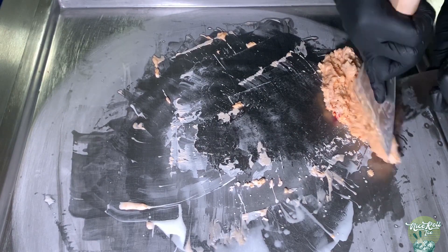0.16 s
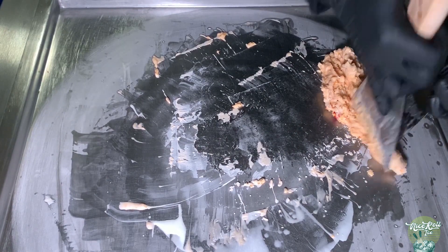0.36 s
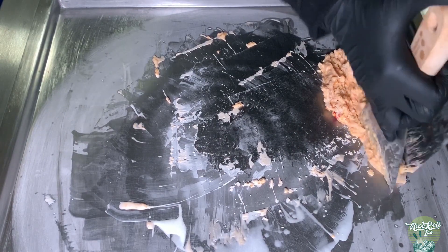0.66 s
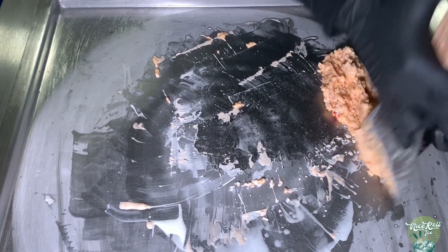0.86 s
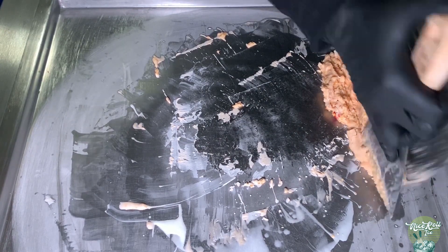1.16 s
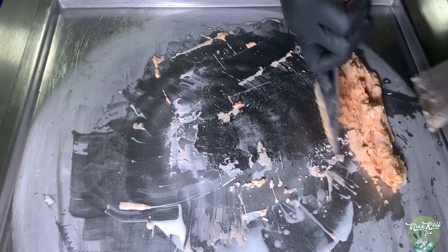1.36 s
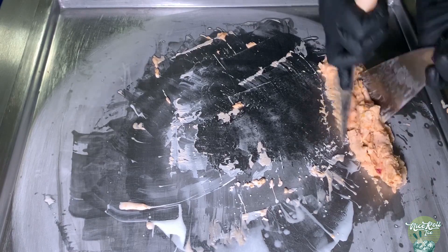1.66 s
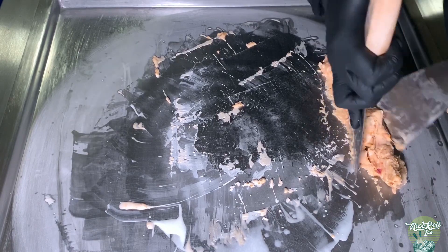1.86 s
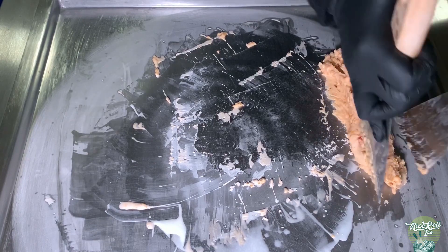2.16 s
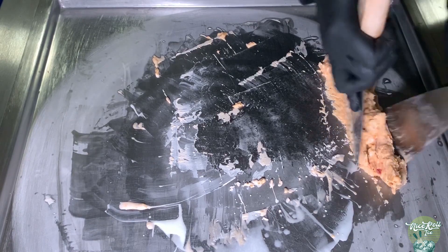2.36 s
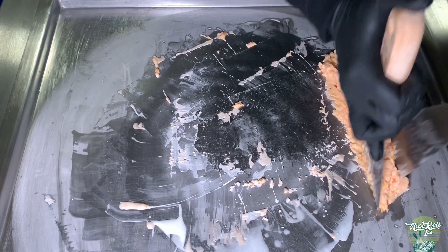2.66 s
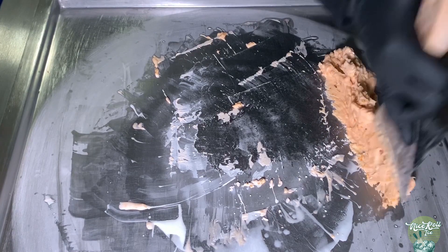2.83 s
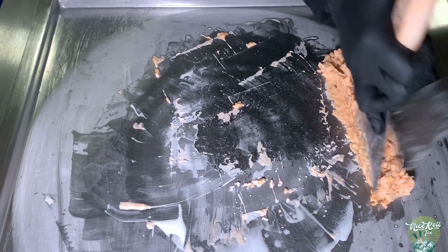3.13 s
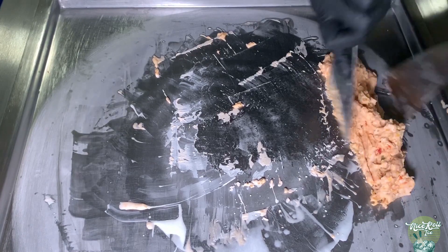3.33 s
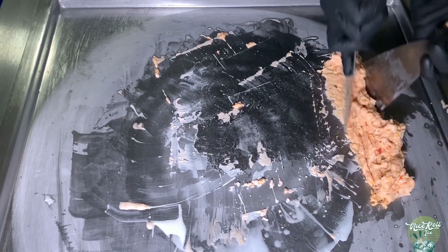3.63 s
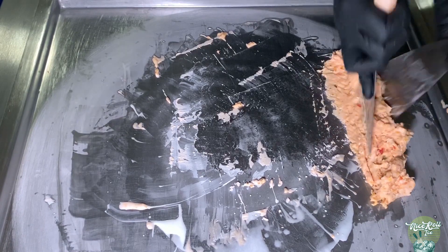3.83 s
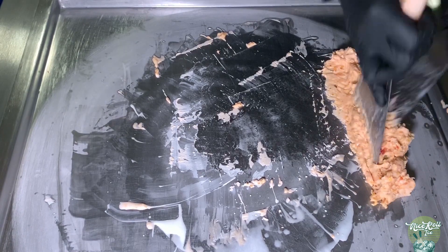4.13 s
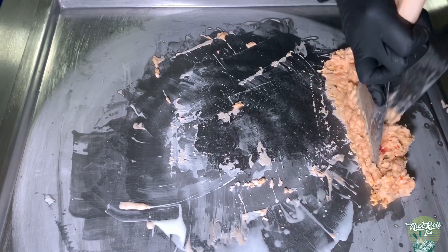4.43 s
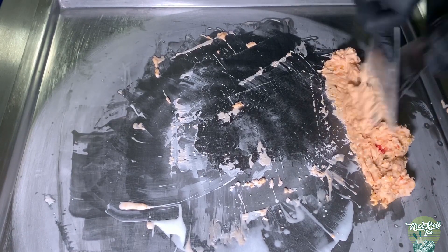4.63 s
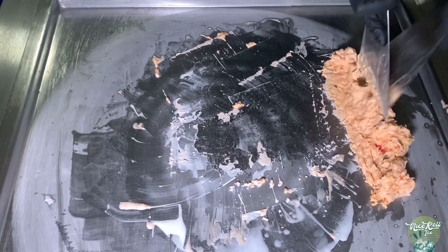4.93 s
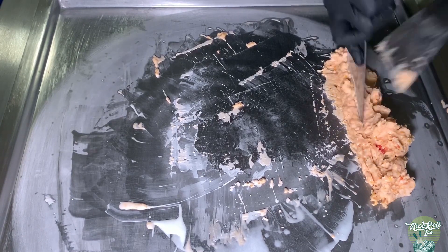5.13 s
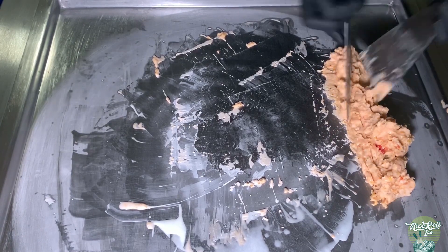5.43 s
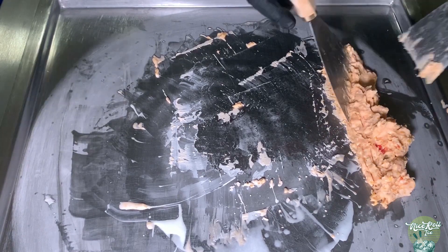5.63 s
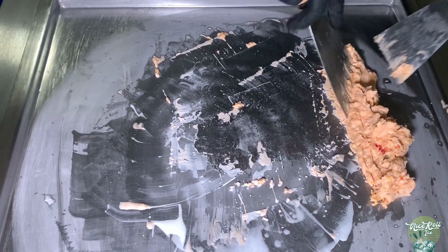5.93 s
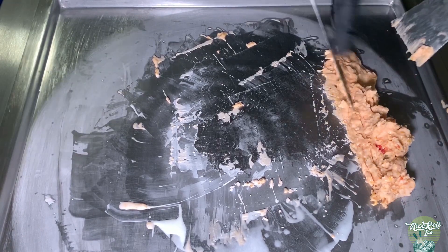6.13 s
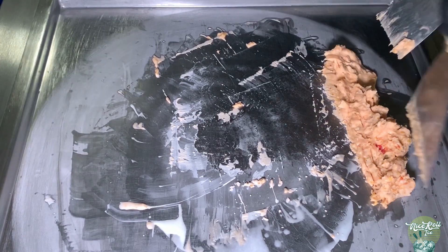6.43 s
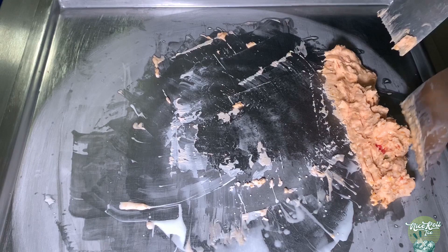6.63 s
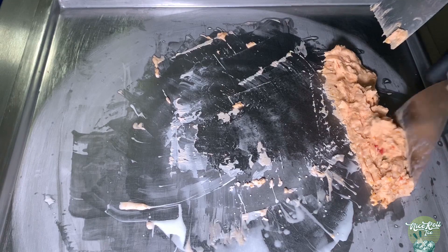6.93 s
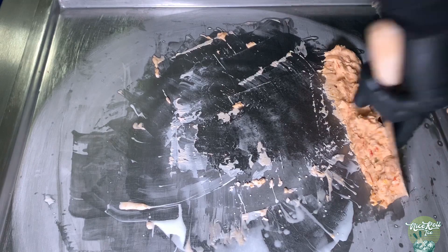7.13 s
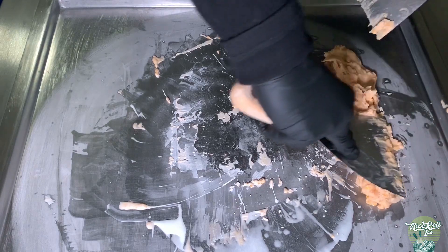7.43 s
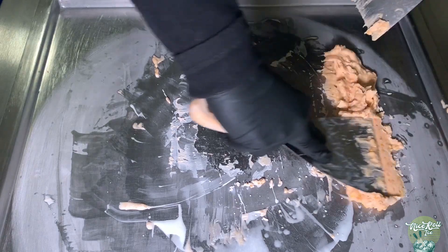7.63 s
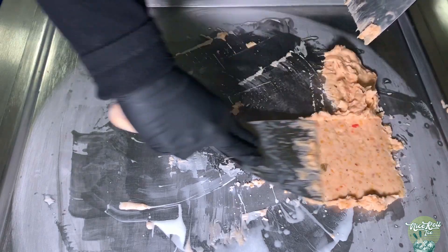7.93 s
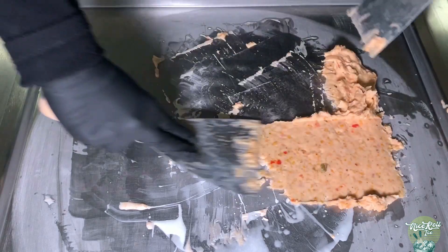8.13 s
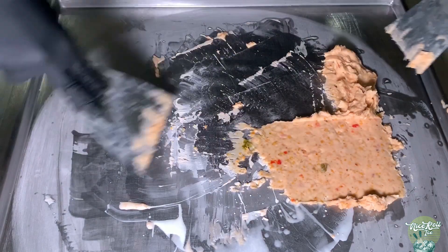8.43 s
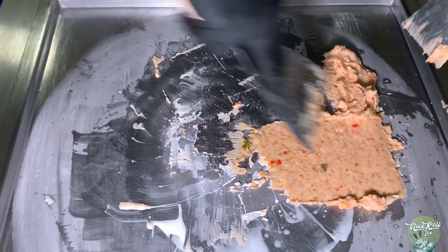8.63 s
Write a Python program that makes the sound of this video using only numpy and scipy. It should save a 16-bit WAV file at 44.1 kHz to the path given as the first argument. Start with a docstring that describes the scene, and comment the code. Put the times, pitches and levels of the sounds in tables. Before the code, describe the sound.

Two metal spatulas chop and clack quickly on a cold steel plate, with short squeaky scrapes, over a steady low compressor hum and fan rush.

```python
"""A compressor hums and its fan rushes; then two steel spatulas chop half-frozen cream on a cold plate.
Hum is a sum of wavering sines and the fan is coloured noise; each blow is a burst of bending waves that
excites the resonances of plate and blade. Dragged edges judder in stick and slip or squeal, cream
crunches as random breaking grains, and one long stroke rasps. A small hard room answers the spatulas."""
import sys
import numpy as np
from scipy import signal
from scipy.fft import rfft, irfft, next_fast_len
from scipy.io import wavfile
from scipy.ndimage import uniform_filter1d

SR = 44100
rng = np.random.default_rng(int(sys.argv[2]) if len(sys.argv) > 2 else 0)


def generate_wav(sig):
    """Save sig (samples, or channels by samples) to the path in sys.argv[1] as 16-bit PCM at SR."""
    pcm = np.round(np.clip(np.atleast_2d(sig).T, -1, 1) * 32767).astype(np.int16)
    wavfile.write(sys.argv[1], SR, pcm)


N = 387198
TIME = np.arange(N) / SR

# blade dragged in stick and slip: (t/s, length/s, relative level/dB, first slip rate f/Hz,
# last slip rate f/Hz, roughness 0-1)
DRAG_STROKES = [(1.511, 0.122, -26.5, 688, 669, 0.17), (1.623, 0.086, -29.5, 845, 930, .17),
                (1.724, 0.065, -43, 897, 819, 0.12), (2.438, 0.044, -28.5, 754, 696, 0.18),
                (2.491, 0.043, -27, 725, 788, .14), (3.544, 0.056, -38, 906, 865, 0.22),
                (3.628, 0.0584, -27.5, 830, 901, 0.29)]
# resonances of plate and blade in contact: (f/Hz, width/Hz, lift/dB)
CONTACT_MODES = [(620, 45, 9), (673, 64, 5.5), (754, 45, 5.5), (910, 38, 5.5), (1033, 106, 5.5),
                 (1556, 140, 3.5), (1790, 43, 2), (1890, 60, 7), (2580, 270, 3.5), (2820, 120, 3),
                 (3780, 330, 1.5), (6270, 680, 4), (8100, 49, 8.5), (8770, 140, 8.5)]
# spectrum of the sounding blade: (f/Hz, relative level/dB)
BLADE_SPECTRUM = [(500, -0.5), (2000, -3.5), (3500, -1.5), (5500, -3), (8500, 2.5), (12000, 0.5),
                  (16000, -4.5)]

# strokes: attack and release times, and rates of easing off (a negative rate swells)
DRAG_ATTACK_S, PUSH_ATTACK_S, RELEASE_S = 0.018, 0.011, 0.021
DRAG_EASE_DB_PER_S, CRUNCH_EASE_DB_PER_S, RASP_EASE_DB_PER_S = 38, -1, 15
# start and length of the long spreading stroke, which both rasps and crunches
SPREAD_S, SPREAD_LENGTH_S = 8.171, 0.26


def from_db(db):
    """Level to amplitude: 20 dB is a factor of ten."""
    return 10 ** (np.asarray(db) / 20)


def rms_one(x):
    """Normalisation to unit mean power."""
    return x / np.sqrt(np.mean(x ** 2) + 1e-20)


def at_hz(points, hz):
    """Interpolation of a spectrum on a logarithmic frequency axis."""
    points = np.array(points)
    return np.interp(np.log(np.maximum(hz, 1)), np.log(points[:, 0]), points[:, 1])


def add(track, s, sound):
    """Superposition: a sound is summed into a track from time s."""
    at = round(s * SR)
    track[..., at:at + sound.shape[-1]] += sound[..., :N - at]


def band(x, low_hz, high_hz):
    """Band-pass filtering with a maximally flat response."""
    edges = [low_hz, min(high_hz, .45 * SR)]
    return signal.sosfilt(signal.butter(2, edges, "band", fs=SR, output="sos"), x)


def drift(rate):
    """Random modulation of unit spread, interpolated between `rate` knots per second."""
    knots = rms_one(rng.standard_normal(int(rate * N / SR) + 2))
    return np.interp(TIME * rate, np.arange(len(knots)), knots)


def pair(x, likeness):
    """Interchannel correlation: sum and difference of two unrelated signals become left and right."""
    c = np.clip(likeness, -1, 1)
    common = np.sqrt(1 + c) * x[0]
    opposed = np.sqrt(1 - c) * x[1] * np.array([[1], [-1]])
    return (common + opposed) / np.sqrt(2)


def causal(x, db):
    """Minimum-phase filtering: the folded cepstrum of a gain curve (even grid) gives its causal response."""
    cepstrum = irfft(np.log(from_db(db)))
    half = cepstrum.shape[-1] // 2
    cepstrum[..., 1:half] *= 2
    cepstrum[..., half + 1:] = 0
    response = np.atleast_2d(irfft(np.exp(rfft(cepstrum))))
    return signal.fftconvolve(x, response, axes=-1)[:, :x.shape[-1]]


def colour(x, spectrum, modes=(), size=8192):
    """Source-filter colouring: a broad spectrum with resonance peaks on top."""
    hz = np.arange(size // 2 + 1) * SR / size
    peaks = sum(lift / (1 + (2 * (hz - f) / width) ** 2) for f, width, lift in modes)
    return causal(x, at_hz(spectrum, hz) + peaks)


def evened(x, size=9):
    """Spectral whitening: chance peaks are evened out, so that a burst has no pitch of its own."""
    power = uniform_filter1d(np.abs(rfft(x)) ** 2, size)
    return causal(x, -10 * np.log10(power + 1e-12))


def dense_noise(n, size=1024, count=4):
    """Diffuse noise pair: repeated flattening of the short-time spectrum evens energy over time and pitch."""
    x = rng.standard_normal((2, n))
    for _ in range(count):
        cells = signal.stft(x, nperseg=size)[2]
        x = signal.istft(cells / (np.abs(cells) + 1e-12), nperseg=size)[1][:, :n]
    return rms_one(x)


def stroke(start, length, attack_s, ease_db_per_s):
    """Contact pressure of one stroke over the whole scene: attack, exponential easing, release."""
    t = TIME - start
    attack = np.clip(t / attack_s, 0, 1)
    release = np.clip((length - t) / RELEASE_S, 0, 1)
    return attack * release * from_db(-ease_db_per_s * np.clip(t, 0, length))


def grains(per_s, spread_db, likeness):
    """Random fracture: ice crystals break as sparse impulses, a few of them loudly."""
    sizes = from_db(spread_db * np.minimum(rng.exponential(1, (2, N)), 4))
    signed = sizes * rng.choice([-1, 1], (2, N))
    return pair(signed * (rng.random((2, N)) < per_s / SR), likeness)


def gripped(share, damping, spot_db=3.0, grip=0.033):
    """Contact damping: the edge's grip scales width and lift; spot and grip favour and shift each mode."""
    chance = rng.uniform(-0.99, 1, (len(CONTACT_MODES), 2))
    return [(hz * (1 + grip * shift), width * damping, share * lift + spot_db * favour)
            for (hz, width, lift), (shift, favour) in zip(CONTACT_MODES, chance)]


def contact(t60, snap, likeness, rise_s=.0001, hold=1.27, size=3072):
    """Impact: a snap, then bending waves build up, hold, and scatter differently to the two sides."""
    t = np.arange(size) / SR
    envelope = from_db(-60 * (t / t60) ** hold) * (1 - np.exp(-t / rise_s))
    waves = pair(rng.standard_normal((2, size)), likeness) * envelope
    waves[:, 0] += snap
    return evened(waves)


def unit_blow(x):
    """Short-time normalisation: the loudest five milliseconds get an rms of 1."""
    power = uniform_filter1d(np.mean(x ** 2, axis=0), SR // 200, mode="constant")
    return x / np.sqrt(power.max())


def struck(force, spectrum, rings, free_share=0.61, damping=1.23):
    """Forced resonance: one blow rings out briefly and reaches the right side first."""
    left_lag_s = .00005
    padded = np.pad(force, ((0, 0), (0, SR // 10)))   # time to ring out
    left, right = colour(padded, spectrum, gripped(free_share, damping) + rings)
    return np.array([np.roll(left, round(left_lag_s * SR)), right])


def compressor(waver_db=1.5, rattle_db=3.5, pan_db=-0.9):
    """Line spectrum: shaft and mains lines stand firm; the higher panel tones waver more."""
    # hum lines: (f/Hz, level/dB rms before waver and pan, phase of left against right/rad)
    lines = [(49.4, -36.5, .05), (100, -29.5, 0.34), (109.6, -45.5, 0.17), (148.4, -44.5, 0.16),
             (222.1, -47.5, 0.41), (247.7, -45, .1), (296.2, -49, .2), (392.4, -53.5, .2),
             (433, -53.5, 1.73)]
    out = 0
    for k, (hz, db, lead) in enumerate(lines):
        loose = waver_db if k < 2 else rattle_db
        phase = 2 * np.pi * hz * TIME + 0.05 * loose * drift(5) + rng.uniform(0, 2 * np.pi)
        tone = np.sqrt(2) * np.sin(phase + lead * np.array([[.5], [-.5]]))
        out = out + from_db(db + loose * drift(7)) * tone
    return out * from_db([[pan_db], [-pan_db]])


def fan(rush_db=-34 - 1, rumble_db=-37):
    """Broadband flow noise through cabinet and pipe resonances, with a lumpy narrow-band cabinet rumble."""
    # spectrum of the rush: (f/Hz, relative level/dB)
    rush_spectrum = [(130, -7), (165, -1), (195, -10), (270, -13.5), (340, -17), (420, -18), (490, -24.5),
                     (650, -22), (1000, -22), (2000, -29), (4000, -39), (7000, -44.5), (12000, -47.5),
                     (16000, -57.5)]
    # cabinet and pipe resonances in the rush: (f/Hz, width/Hz, lift/dB)
    cabinet_modes = [(579, 113, 8), (904, 18, 9), (2440, 9.9, 10.5), (2694, 15, 11), (4750, 17, 13),
                     (5070, 44, 8), (8230, 180, 9.5)]
    # correlation of left and right: (f/Hz, likeness)
    side_likeness = [(50, .98), (150, 0.96), (300, 1), (500, 0.15), (1000, 0.2), (3000, 0.06), (9000, 0.05)]
    right_lag_s = .00032   # the fan stands to the left
    hz = np.arange(N // 2 + 1) * SR / N
    arrival = np.exp(-2j * np.pi * hz * right_lag_s * np.array([[0], [1]]))
    noise = rfft(rng.standard_normal((2, N)))
    air = irfft(arrival * pair(noise, at_hz(side_likeness, hz)), N)
    high_pass = signal.butter(2, 125, "high", fs=SR, output="sos")
    rush = signal.sosfilt(high_pass, colour(air, rush_spectrum, cabinet_modes))
    rumble = band(band(air, 117.0, 176.4), 117.0, 176.4)
    return from_db(rush_db) * rms_one(rush) + from_db(rumble_db) * rms_one(rumble)


def knocks(knock_db=-18.0, clang_db=-18.0, sizzle_db=-28,
           plate_width_hz=220, plate_lift_db=4.5, blade_width_hz=280, blade_lift_db=6):
    """Dispersion of bending waves: high ones arrive first and die first, and grow with the bite."""
    # edge strikes plate: (t/s, relative level/dB, thud level/dB, bite offset/dB, sizzle offset/dB,
    # plate ring f/Hz, blade ring f/Hz); bite and sizzle are low where cream cushions the blow
    # and high where the edge meets bare steel
    plate_blows = [(0.342, -8, -23.5, -10.5, -3.5, 660, 2640), (0.439, -12, -24, 2.5, 5, 760, 2200),
                   (0.527, -3.5, -28, -3.5, -3.5, 650, 2700), (0.573, -2, -21, 1.5, 4, 640, 2200),
                   (0.711, -3, -22, 1.5, 1, 760, 2500), (0.876, -3.5, -30, -7, -6, 740, 2300),
                   (0.944, -2.5, -21.5, 4, 3, 750, 2670), (1.041, -0.5, -25, -0.5, 1.5, 655, 2420),
                   (1.16, -16.5, -17, 1, -1, 740, 2400), (1.494, -9, -26, 4, -1, 700, 2680),
                   (1.503, -4.5, -16.5, 7, 1, 700, 2660), (1.584, -13, -18.5, -0.5, 0, 680, 2300),
                   (1.638, -15, -18, -9, -1, 850, 1750), (2.412, -1.5, -23, -4.5, -4, 645, 2630),
                   (2.498, -15, -33, 1.5, -1, 750, 2160), (2.73, -12, -25, 0, 1, 680, 2650),
                   (3.415, -7.5, -20.5, 0.5, 2, 855, 2600), (3.44, -11.5, -14.5, 13.5, 8, 730, 2880),
                   (3.452, -17.5, -13, 4, 7, 730, 2500), (4.069, -3.5, -29, -3, -3, 660, 2370),
                   (4.603, -21.5, -25, -9, -1, 930, 2000), (4.769, -2, -13, 2, -3, 785, 2850),
                   (5.023, -1.5, -21, -1, -2, 720, 2520), (5.385, -5, -19.5, -1, -0.5, 720, 2480),
                   (8.257, -25, -30, 15.5, 22, 920, 2330), (8.281, -25, -20, 9.5, 25, 900, 3300)]
    # spectrum of the struck plate: (f/Hz, relative level/dB)
    plate_spectrum = [(100, 3.5), (270, 0), (480, -2.5), (750, 1), (1300, -3), (2200, 5.5), (3200, 0),
                      (5000, 1.5), (7400, 7.5), (10000, 3.5), (15000, 6.5)]
    # thud and broad upper ring under a pressing edge, hollows between: (f/Hz, width/Hz, lift/dB)
    pressed_modes = [(346, 120, 5), (591, 67, -3.5), (840, 55, -4), (1001, 115, 5)]
    # clang of a struck blade: (multiple of its ring frequency, share of the lift)
    partials = [(.7, 0.33), (1, 0.85), (1.22, 0.33)]
    chatter_s = 0.025   # reference for the decay of the edge's chatter; each band takes a share of it
    out = np.zeros((2, N))
    for s, db, thud, bite, sizzle, plate_hz, blade_hz in plate_blows:
        low = band(contact(0.79 * chatter_s, snap=0.61, likeness=0.98, rise_s=0.0061), 125, 437)
        mid = band(contact(0.93 * chatter_s, snap=2.1, likeness=0.59, rise_s=0.0012), 435, 1253)
        high = band(contact(0.78 * chatter_s, snap=1.93, likeness=0.42, rise_s=0.00082), 1310, 3770)
        top = band(contact(0.46 * chatter_s, snap=2.4, likeness=0.47, rise_s=0.00026), 3800, 11800)
        force = from_db(thud) * unit_blow(low) + from_db(knock_db) * unit_blow(mid)
        force += from_db(clang_db + bite) * unit_blow(high)
        force += from_db(sizzle_db + sizzle) * unit_blow(top)
        rings = [(plate_hz, plate_width_hz, plate_lift_db)]
        rings += [(blade_hz * k, blade_width_hz, share * blade_lift_db) for k, share in partials]
        add(out, s, from_db(db) * struck(force, plate_spectrum, rings + pressed_modes))
    return out


def room(x, delay_s=0.0027, build_s=0.00061, likeness=0.1):
    """Reverberation: dense reflections, different on each side, die sooner in the treble."""
    # reverberation time: (f/Hz, t60/s)
    decay_times = [(200, 0.45), (530, 0.49), (1400, 0.22), (3700, 0.17), (9700, 0.19)]
    # spectrum of the reflections: (f/Hz, relative level/dB)
    echo_spectrum = [(150, -14), (380, 7.5), (660, 1), (1900, 5), (2700, 2), (4500, 2), (9000, -6.5),
                     (15000, -4.5)]
    t = np.arange(SR // 2) / SR
    edges = np.geomspace(100, 18000, num=11)
    tail = 0
    # neighbouring bands use different noises
    noises = [pair(dense_noise(len(t)), likeness) for _ in range(2)]
    for k, (low, high) in enumerate(zip(edges, edges[1:])):
        t60 = at_hz(decay_times, np.sqrt(low * high))
        tail = tail + band(noises[k % 2], low, high) * from_db(-60 * t / t60)
    build_up = 1 - np.exp(-np.maximum(t - delay_s, 0) / build_s)
    tail = evened(tail * build_up, size=31)
    tail = colour(tail / np.sqrt(np.sum(tail ** 2) / 2), echo_spectrum)
    return signal.fftconvolve(x, tail, axes=-1)[:, :N]


def crunches(clump_db=3.5, drag_crunch_db=-12.5, spread_crunch_db=-41):
    """Granular fracture: cream crumbles along the blade under each push, drag and the spreading stroke."""
    # blade shears the frozen cream: (t/s, length/s, relative level/dB)
    pushes = [(0.793, .12, -44.5), (0.905, 0.067, -33), (1.105, 0.063, -35.5), (1.498, 0.039, -27),
              (2.489, 0.033, -30.5), (3.505, 0.05, -42.5), (5.617, 0.32, -56), (6.925, 0.05, -44)]
    pressure = sum(from_db(db) * stroke(s, length, PUSH_ATTACK_S, CRUNCH_EASE_DB_PER_S)
                   for s, length, db in pushes)
    # cream crumbles ahead of every dragged edge, at a level relative to the drag
    pressure += sum(from_db(db + drag_crunch_db) * stroke(s, length, DRAG_ATTACK_S, DRAG_EASE_DB_PER_S)
                    for s, length, db, *_ in DRAG_STROKES)
    spread = stroke(SPREAD_S, SPREAD_LENGTH_S, PUSH_ATTACK_S, CRUNCH_EASE_DB_PER_S)
    pressure += from_db(spread_crunch_db) * spread
    clumps = from_db(clump_db * drift(130))
    ice = grains(per_s=5600, spread_db=4.5, likeness=0.063)
    return pressure * clumps * rms_one(colour(ice, BLADE_SPECTRUM, CONTACT_MODES))


def ticks(level_db=-15.5, clang_db=-19, ring_width_hz=1400, ring_lift_db=8.0):
    """Impulsive excitation of a high blade resonance gives a thin, bright click."""
    # bright clicks of a blade, some on top of a plate blow: (t/s, relative level/dB, blade ring f/Hz)
    clicks = [(0.835, -24, 13000), (0.858, -16.5, 9900), (1.119, -21, 9400), (1.145, -21, 13000),
              (2.881, -13, 13700), (2.891, -7.5, 13400), (3.031, -24.5, 13000), (3.072, -26, 13000),
              (3.100, -7.5, 8150), (3.115, -11, 13500), (3.44, -5, 9100), (4.441, -30, 9000),
              (4.769, -6.5, 9100), (5.544, -16, 8950), (8.219, -12.5, 9450), (8.280, -7, 9200)]
    out = np.zeros((2, N))
    for s, db, ring_hz in clicks:
        click = unit_blow(contact(t60=0.018, snap=1.1, likeness=0.067))
        body = unit_blow(band(contact(t60=0.024, snap=1.3, likeness=0.16), 1900, 6400))
        force = from_db(db + level_db) * (click + from_db(clang_db) * body)
        add(out, s, struck(force, BLADE_SPECTRUM, [(ring_hz, ring_width_hz, ring_lift_db)]))
    return out


def squeals(waver=0.027, judder_db=3.0, overtone_db=-20):
    """Friction locking onto a blade resonance: a gliding tone swells and fades, shaken by the ice's grip."""
    # squealing edge: (t/s, length/s, level/dB at the height of the swell, first f/Hz, last f/Hz)
    glides = [(1.487, 0.038, -28, 2700, 2630), (1.513, .016, -30, 8600, 8460),
              (1.542, .036, -32, 2630, 2670), (1.630, 0.029, -29, 850, 900),
              (2.501, 0.024, -28.5, 2120, 2140), (2.503, 0.037, -28, 1650, 1787),
              (2.517, 0.032, -22.5, 990, 1047), (3.414, 0.0089, -18, 2630, 2650),
              (3.445, 0.027, -26.5, 8600, 8540), (3.506, .04, -42, 1910, 1880),
              (3.527, 0.067, -29, 894, 877), (3.546, .024, -37.5, 2590, 2650),
              (8.186, 0.01, -29, 2190, 2160), (8.28, 0.01, -26, 3280, 3280),
              (8.32, 0.016, -32.5, 2040, 2150), (8.358, 0.04, -30, 1436, 1388)]
    out = np.zeros((2, N))
    shake, grab = drift(700), drift(420)
    for s, length, db, first_hz, last_hz in glides:
        u = np.linspace(0, 1, int(length * SR))
        now = round(s * SR) + np.arange(len(u))
        hz = (first_hz + (last_hz - first_hz) * u) * (1 + waver * shake[now])
        phase = 2 * np.pi * np.cumsum(hz) / SR
        tone = np.sin(phase) + from_db(overtone_db) * np.sin(2 * phase)
        swell = np.sin(np.pi * u)
        add(out, s, from_db(db) * swell * rms_one(from_db(judder_db * grab[now]) * tone))
    return out


def drags(grit=0.63, judder_db=5.5, judder_slips=4):
    """Stick-slip friction: even slips squeal, uneven ones groan, and ice grains crack under the edge."""
    # spectrum of the dragged blade on the plate: (f/Hz, relative level/dB)
    body_spectrum = [(100, -7), (320, 5.5), (480, 0), (740, 6), (1250, -1.5), (1650, -2), (2000, -3.5),
                     (3000, -11.5), (4500, -14), (7500, -22), (16000, -24)]
    out = np.zeros((2, N))
    ice = rms_one(band(grains(per_s=300, spread_db=3.5, likeness=0.29), 920, 4800))
    for s, length, db, first_hz, last_hz, rough in DRAG_STROKES:
        n = int(length * SR)
        chance = rng.standard_normal((4, 512))
        slips = np.arange(chance.shape[1])
        slip_hz = np.interp(slips, [0, length * first_hz], [first_hz, last_hz])
        at = np.cumsum(SR / slip_hz * np.exp(rough * chance[0])).astype(int)
        # the blade bounces, so a few slips in a row bite hard and the next ones lightly
        grab = from_db(judder_db * np.interp(slips / judder_slips, slips, chance[3]))
        impulses = grab * (1 + 3 * rough * chance[1:3])
        force = np.zeros((2, SR // 2))
        force[:, at[at < n]] = impulses[:, at < n]
        cracks = grit * rough * ice[:, round(s * SR):][:, :n]
        pressure = stroke(0, length, DRAG_ATTACK_S, DRAG_EASE_DB_PER_S)[:n]
        force[:, :n] = (force[:, :n] - force[:, :n].mean() + cracks) * pressure
        sound = colour(band(force, 110, 18000), body_spectrum, gripped(0.91, 1))
        add(out, s, from_db(db) * sound / np.sqrt(np.sum(sound ** 2) / (2 * n)))
    return out


def spreading(level_db=-39, judder_db=2.0, catch_s=0.0057):
    """Modulated friction noise: the flat blade stutters; as it bends down, lower resonances take over."""
    # blade catches and jumps on: (t/s, added surge level/dB relative to the steady rasp)
    jumps = [(8.179, -0.5), (8.232, 4), (8.245, 0), (8.288, 0), (8.314, 3), (8.332, 10)]
    # spectrum of the rasp: (f/Hz, relative level/dB)
    rasp_spectrum = [(300, -36), (900, -4), (2000, -2.5), (3000, -7), (4500, -10), (6000, -14), (8000, -27),
                     (16000, -36)]
    # resonances of the flat blade and when each sings: (f/Hz, width/Hz, lift/dB, t/s, length/s)
    singing_modes = [(3270, 170, 14, 8.162, .135), (2220, 450, 12, 8.162, 0.18),
                     (1400, 240, 7, 8.305, .105)]
    # catch_s is the time constant of each catch's decay
    surges = sum(from_db(db) * (TIME > s) * np.exp(-np.abs(TIME - s) / catch_s) for s, db in jumps)
    pressure = stroke(SPREAD_S, SPREAD_LENGTH_S, PUSH_ATTACK_S, RASP_EASE_DB_PER_S)
    pressure = pressure * (1 + surges) * from_db(judder_db * drift(150))
    ice = grains(per_s=1400, spread_db=6.0, likeness=0.14)
    rasp = pressure * rms_one(colour(ice, rasp_spectrum))
    singing = 0
    for hz, width, lift, s, length in singing_modes:
        resonance = colour(rasp, [(1, 0)], [(hz, width, lift)]) - rasp   # what the mode adds
        singing = singing + resonance * stroke(s, length, PUSH_ATTACK_S, 0)
    return from_db(level_db) * (rasp + singing)


def microphones(x, shared_above_hz=6470, treble_share=0.98, left_lag_s=.000215):
    """Interchannel coherence: in the high treble both sides nearly share one sound, the left later."""
    size = next_fast_len(N + SR // 10)
    hz = np.arange(size // 2 + 1) * SR / size
    left, right = rfft(x, size)
    share = treble_share / (1 + (shared_above_hz / (hz + 1)) ** 16)
    delayed = right * np.exp(-2j * np.pi * hz * left_lag_s)
    left = np.sqrt(1 - share ** 2) * left + share * delayed
    return irfft(np.array([left, right]), size)[:, :N]


def scene(blow_room_db=-5.0, scrape_room_db=-3, squeal_room_db=-7, scrape_db=0.5):
    """Superposition of direct blows, scrapes and squeals, their room echo, and the running machine."""
    machine = compressor() + fan()
    blows = knocks() + ticks()
    scrapes = from_db(scrape_db) * (crunches() + drags() + spreading())
    tones = squeals()
    sent = from_db(blow_room_db) * blows + from_db(scrape_room_db) * scrapes
    sent += from_db(squeal_room_db) * tones
    return blows + scrapes + tones + room(sent) + machine


def record(dry, cutoff_hz=15800):
    """Saturation and low-pass filtering: a close microphone pair, highest peaks rounded, top cut."""
    rounded = 1.2 * np.tanh(microphones(dry) / 1.2)
    return signal.sosfilt(signal.ellip(10, .2, 80, cutoff_hz, fs=SR, output="sos"), rounded)


dry = scene()
out = record(dry)
generate_wav(out)
```